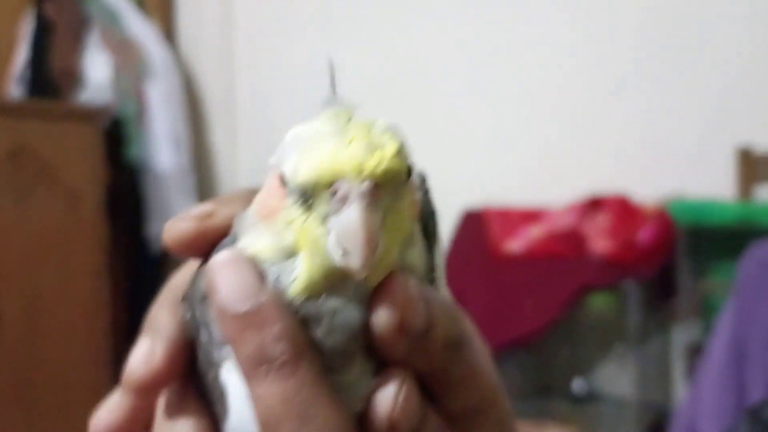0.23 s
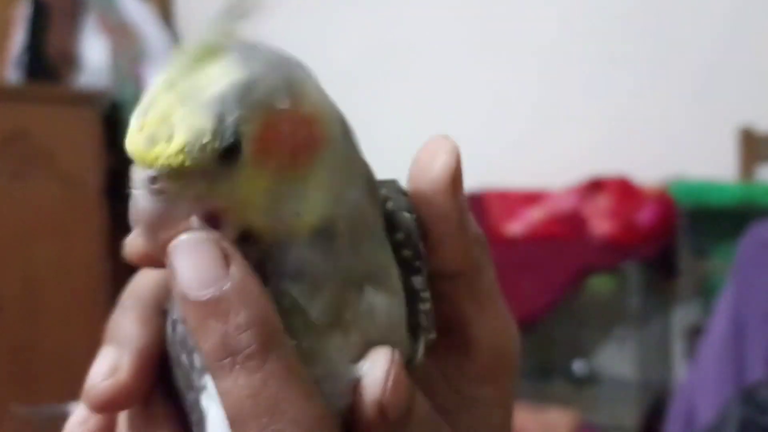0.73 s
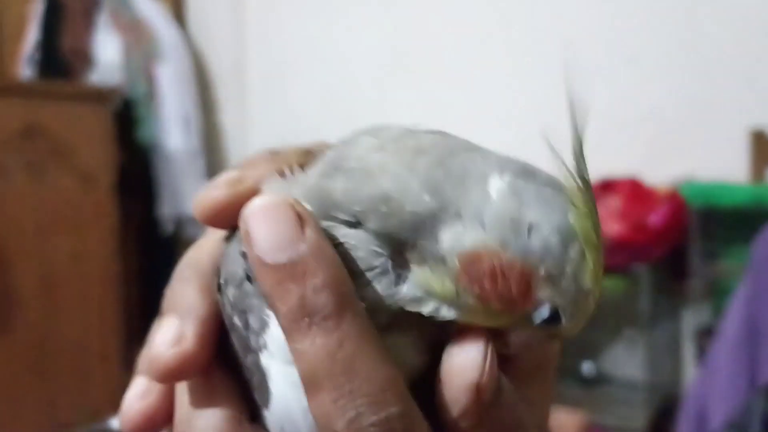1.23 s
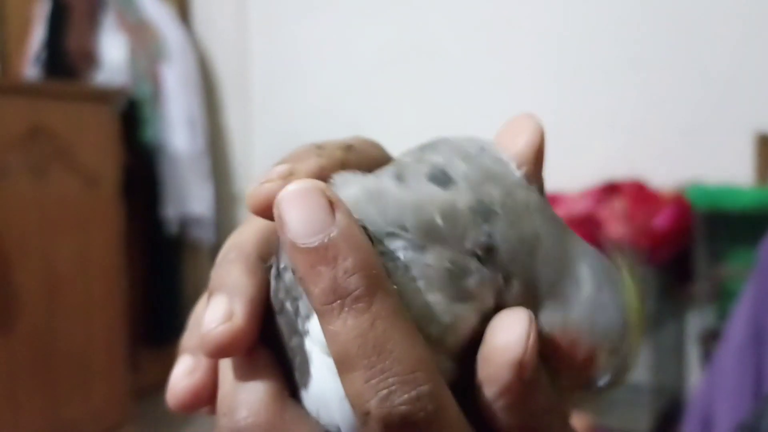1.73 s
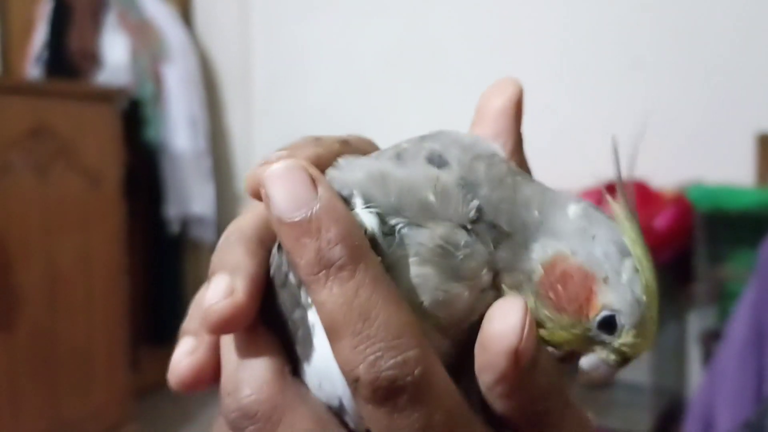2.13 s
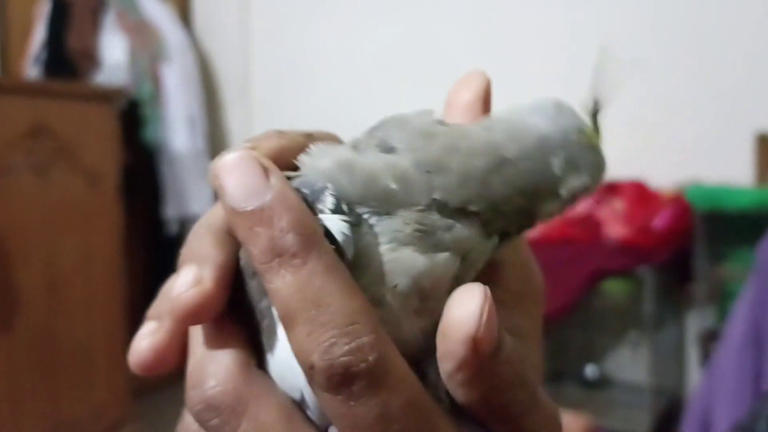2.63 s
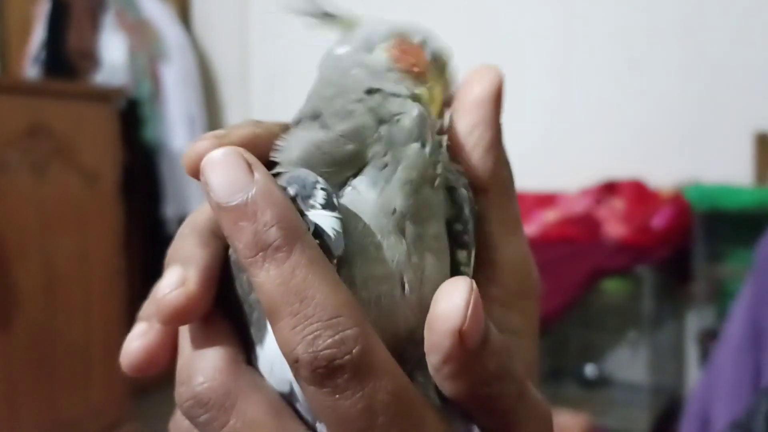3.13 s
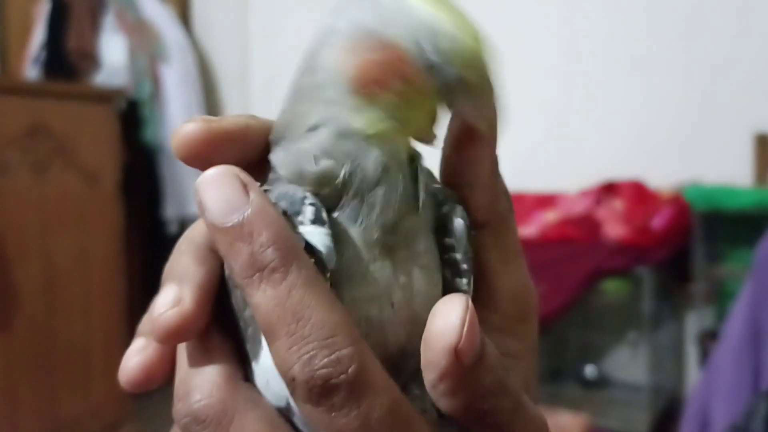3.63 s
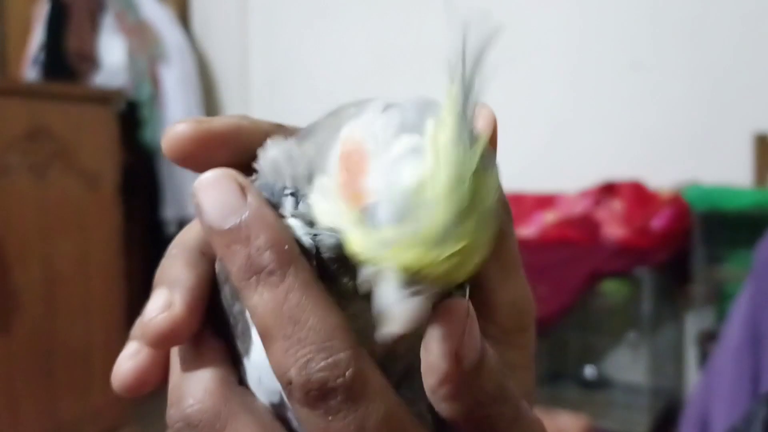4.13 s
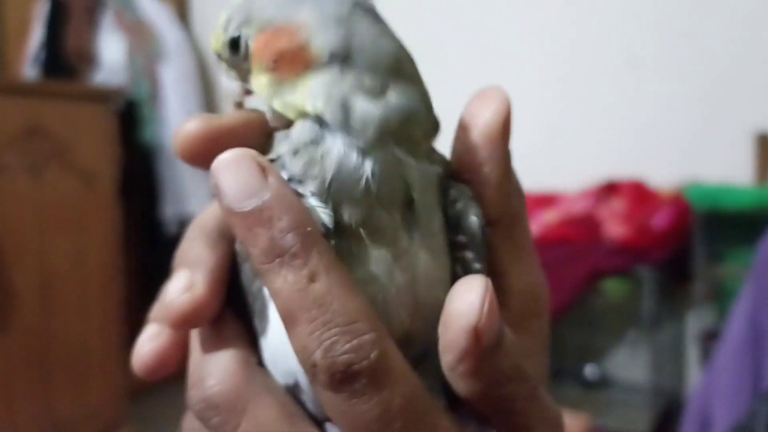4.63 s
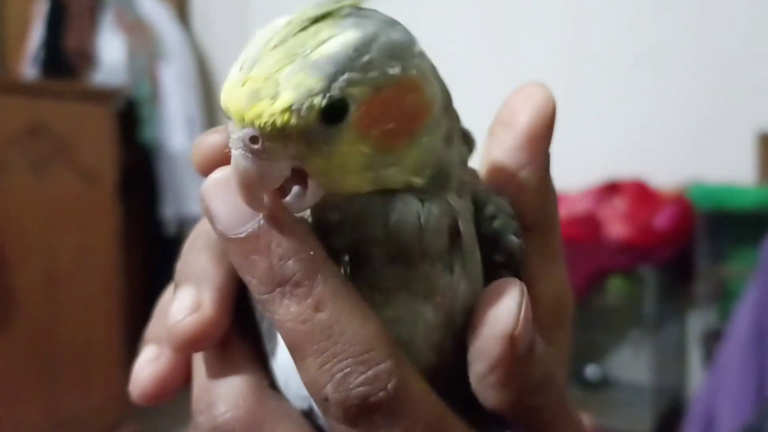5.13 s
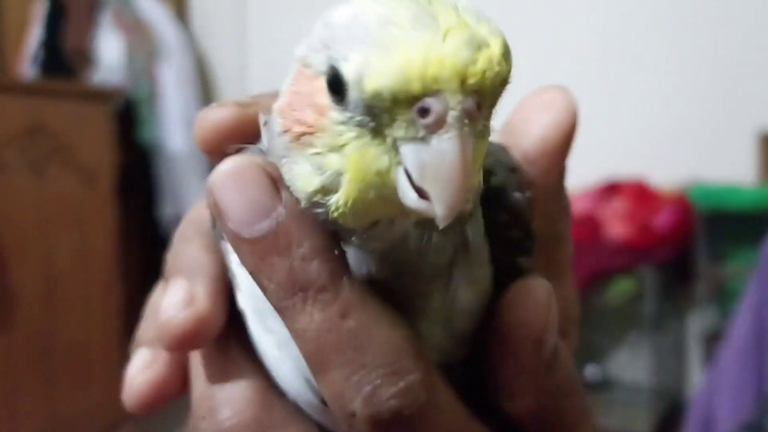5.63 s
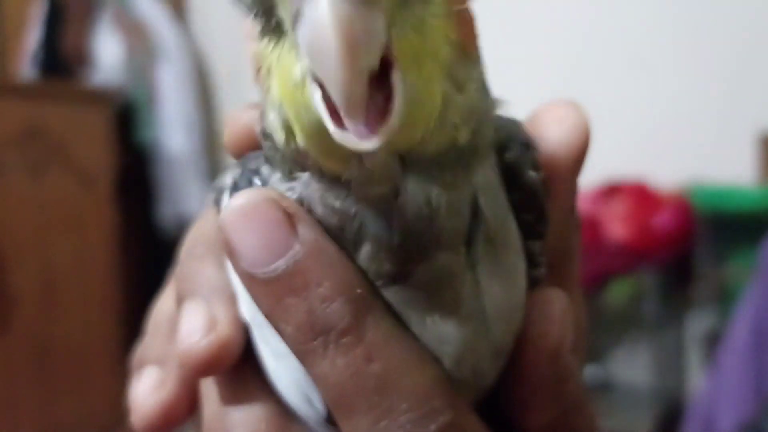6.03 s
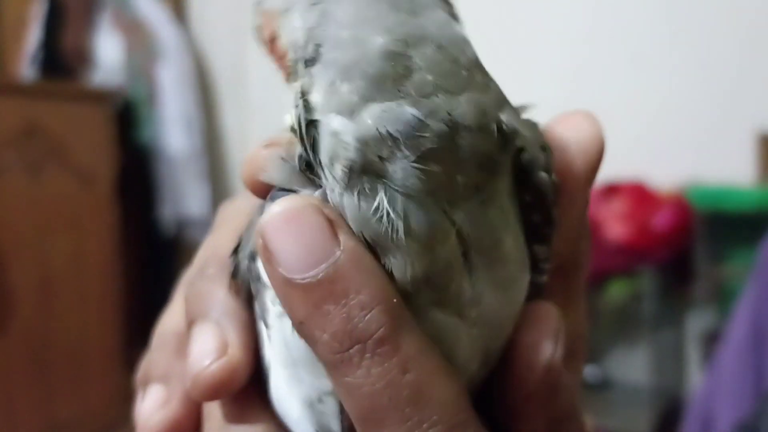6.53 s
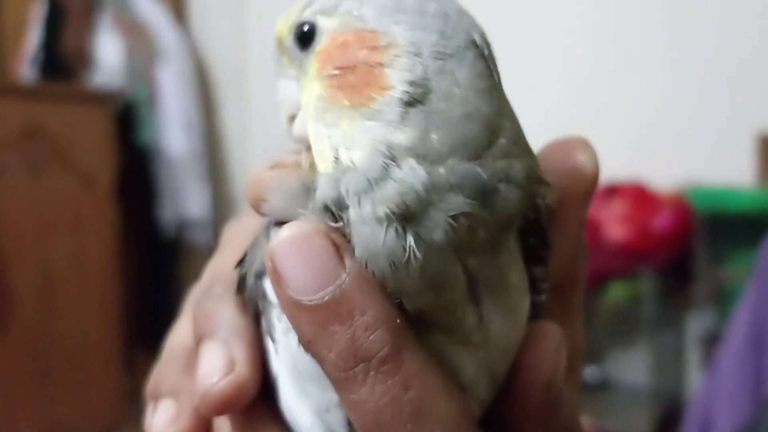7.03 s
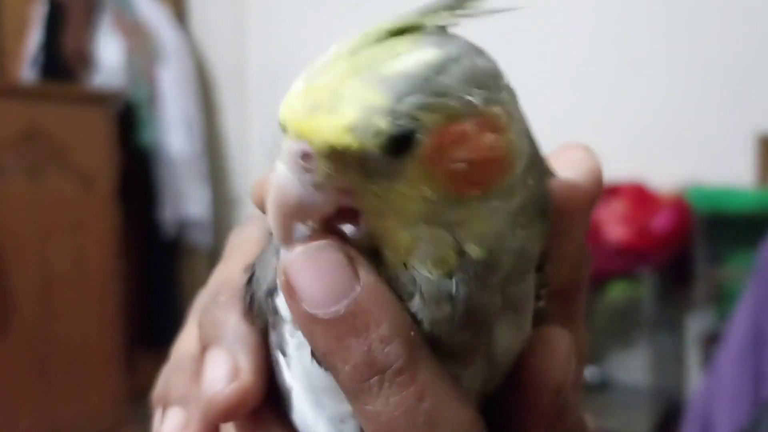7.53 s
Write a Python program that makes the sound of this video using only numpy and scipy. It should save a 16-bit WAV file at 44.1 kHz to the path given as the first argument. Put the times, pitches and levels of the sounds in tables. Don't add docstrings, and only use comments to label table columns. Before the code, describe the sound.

A hand-held cockatiel gives a harsh screech, hisses in breathy bursts with small beak ticks, then squawks again, in a quiet room with faint street rumble.

```python
import sys
import numpy as np
from scipy import signal
from scipy.fft import rfft, irfft, next_fast_len
from scipy.io import wavfile
from scipy.ndimage import uniform_filter1d, map_coordinates

SR = 44100
rng = np.random.default_rng(int(sys.argv[2]) if len(sys.argv) > 2 else 0)


def store_wav(level_fs):
    pcm = np.round(np.clip(np.atleast_2d(level_fs), -1, 1) * 32767)
    wavfile.write(sys.argv[1], SR, pcm.T.astype(np.int16))


def elevation(decibels):
    levels = np.asarray(decibels, float)
    return 10 ** (levels / 20)


N = 343098


def unit(x):
    return x / np.sqrt(np.mean(x ** 2) + 1e-20)


def along(points, hz):
    f, v = np.transpose(points)
    return np.interp(np.log(hz + 1), np.log(f + 1), v)


def curves(rows):
    s, *cols = np.transpose(rows)
    return [np.interp(np.arange(N) / SR, s, c) for c in cols]


def gate(tables, rise_s, fall_s):
    t = np.arange(N) / SR
    spans = []
    for rows in tables:
        since_start = (t - rows[0][0]) / rise_s
        until_end = (rows[-1][0] - t) / fall_s
        spans.append(np.clip(np.minimum(since_start, until_end), 0, 1))
    return np.max(spans, axis=0)


def wobble(rate_hz):
    knots = rng.standard_normal(int(N * rate_hz / SR) + 4)
    return map_coordinates(knots, [np.arange(N) * rate_hz / SR])


def filtered(x, response):
    m = next_fast_len(N + 8192)
    return irfft(rfft(x, m) * response(np.fft.rfftfreq(m, 1 / SR)), m)[..., :N]


def noise(spectrum, channels=1):
    return unit(filtered(rng.standard_normal((channels, N)), lambda hz: elevation(along(spectrum, hz))))


def street():
    # frequency in Hz, level in dB.
    spectrum = [(15, -80), (25, -52), (59, -39), (71, -12.5), (93, 1), (274, -9.5), (410, -12),
                (566, -16.5), (631, -20), (761, -16.5), (919, -21.5), (1380, -24), (3080, -27), (5000, -35),
                (15500, -47.5)]
    # time in seconds, level in dB.
    level = [(0.0, -52), (0.63, -53.5), (0.89, -51.5), (4.94, -55), (5.41, -54), (7.78, -52)]
    # frequency in Hz, left-right correlation from -1 to 1.
    alike = [(30, .1), (50, .3), (75, 1), (130, 0.9), (290, 0.76), (640, 0.19), (1400, -0.28),
             (3100, 0.056), (15000, -0.86)]

    def mid_side_gain(hz):
        turn = np.arccos(np.clip(along(alike, hz), -1, 1)) / 2
        return np.array([np.cos(turn), np.sin(turn)])

    mid, side = filtered(noise(spectrum, channels=2), mid_side_gain)
    balance_db = elevation(1) * np.array([[-.5], [.5]])
    level_db = curves(level)[0] + 1.0 + .8 * wobble(6.4) + balance_db
    return elevation(level_db) * np.array([mid + side, mid - side])


def port_flicker():
    return elevation(-79.5) * noise([(20, -3), (60, -1.5), (90, -44.5)], channels=2)


def rustle():
    # time of peak in seconds, length in seconds, fine part in dB, coarse
    # over fine in dB.
    brushes = [(0.214, 0.36, -61.5, 7.5), (0.655, 0.11, -61, 1.5), (1.668, 0.14, -40, -17.5),
               (1.775, 0.0094, -53, -17.5), (1.794, 0.094, -78, 7.5), (2.115, 0.045, -57, -14.5),
               (4.066, 0.262, -77.5, -5), (4.168, 0.052, -54, -20), (5.011, 0.2, -62.5, 10.5),
               (5.186, 0.037, -67, 1), (5.379, 0.15, -61.5, -7.5), (6.126, .12, -60.5, -3),
               (6.27, 0.1, -59, -21), (6.411, 0.13, -57.5, -20.5), (6.87, 0.11, -66.5, 21),
               (7.665, 0.21, -66.5, 1)]
    # frequency in Hz, level in dB.
    fine_colour = [(7500, -26), (9500, -7), (12000, 1.5), (15500, -4)]
    # frequency in Hz, level in dB.
    coarse_colour = [(2000, -14.5), (3500, -7.5), (4800, -14), (6500, -1), (8000, -25)]
    bed_db, bed_coarse_db = -77.5, -4
    rise_per_length, fall_db_per_length = 0.96, 29
    s, length_s, db, coarse_db = np.transpose(brushes)[..., None]
    age = (np.arange(N) / SR - s) / length_s
    strokes = elevation(db - fall_db_per_length * np.maximum(age, -age / rise_per_length))
    fine = elevation(bed_db) + strokes.sum(0)
    coarse = elevation(bed_db + bed_coarse_db) + (strokes * elevation(coarse_db)).sum(0)
    grain = unit(elevation(1.5 * wobble(400) + 1.5 * wobble(25)))
    brush = fine * noise(fine_colour, channels=2) + coarse * noise(coarse_colour, channels=2)
    return elevation(5.0) * grain * brush * elevation([[1.5], [-1.5]])


def call(crests, half_db, hoarse, thin_db=0, deeper=1, lead_s=.007, tail_s=.008):
    # frequency in Hz, gain in dB.
    throat = [(1200, -8), (2000, -6.5), (2900, -4.5), (3500, -11), (4150, -1.5), (4800, -11.5),
              (5900, -4.5), (6600, -15.5), (7600, -24), (8400, -18.5), (9400, -45), (10500, -28),
              (12000, -22), (13500, -32), (16000, -35.5)]
    # frequency in Hz, level in dB.
    breath = [(5000, -30), (7500, -12), (8600, -10.5), (9300, -33.5), (10200, -9), (12000, 0), (13500, -9),
              (14600, -3), (15600, -6)]
    dip_share = [.35, 1.7, 1, .7, 1, 1, 1]
    quiet_db, least_sag, sag_per_db = -18, .04, .008
    dip_floor_db, dip_db_per_db = 3, .4
    even_db, even_hz = -11, 1640

    end_s, end_warbles, *end_crest = crests[-1]
    run_out = (end_s + .01, end_warbles + .5 * (end_warbles > 0), *end_crest)
    warbles, crest_hz, crest_db = curves(crests + [run_out])
    dip = (1 - np.cos(2 * np.pi * warbles)) / 2
    effort_db = np.clip(crest_db - quiet_db, 0, None)
    dip_db = deeper * dip * (dip_floor_db + dip_db_per_db * effort_db)
    rough = np.minimum(hoarse * elevation(-.9 * (crest_db + 12)), .16) * (1 + 2 * dip)
    sag = (least_sag + sag_per_db * effort_db) * dip
    hz = crest_hz * (1 - sag) * (1 + .25 * rough * wobble(900))
    phase = 2 * np.pi * np.cumsum(hz) / SR

    low_db = even_db * np.clip((even_hz - crest_hz) / 120, 0, 1)
    voice, crest_power = 0, 0
    for k, share in enumerate(dip_share, 1):
        size = elevation(along(throat, k * hz) + thin_db * (k - 4))
        voice = voice + size * elevation(low_db * (k % 2 == 0) - share * dip_db) * np.sin(k * phase)
        crest_power = crest_power + elevation(2 * (along(throat, k * crest_hz) + thin_db * (k - 4.0)))
    voice = voice / np.sqrt(crest_power / 2) + elevation(half_db) * np.sin(phase / 2)

    air = elevation(-19 - 0.66 * dip_db) * noise(breath)[0]
    shake = elevation(16 * rough * wobble(500))
    span = [[crests[0][0] - lead_s], [end_s + tail_s]]
    sung = elevation(crest_db - 8.5) * shake * (voice + air) * gate([span], 0.34 * lead_s, .45 * tail_s)
    return filtered(sung, lambda f: 0.07 + 1.03 / (1 + (1250 / (f + 1)) ** 8))


def screech():
    # time in seconds, warbles so far, crest pitch in Hz, crest level in dB.
    crests = [
        (.024, 0, 1480, -15),
        (.034, 1, 1723, -12),
        (.0565, 3, 1897, -7.5),
        (.07, 4, 2018, -3),
        (.0995, 6, 2116, -4),
        (.1595, 11, 2135, -3.5),
        (.177, 12, 2127, -15),
    ]
    return call(crests, half_db=-31, hoarse=.032)


def ticks():
    # time in seconds, peak in dB, knock over crack in dB, left-right in dB.
    contacts = [(0.3064, -35.5, -9, -9), (0.323, -44, -34.5, 3), (0.388, -53, -10, -7),
                (1.7758, -21, -28, -6.5), (1.7825, -42.5, -20, -5), (1.9806, -47, -6.5, -8.5),
                (2.629, -52, 7, -3.5), (2.683, -67, 23.5, -10.5), (2.8093, -41, 6.5, -13),
                (4.1085, -64, 18, -2.5), (4.3452, -39, -20.5, 5.5), (5.1026, -62, 12, -2),
                (5.137, -46, -9.5, 2.5), (5.143, -33.5, 4.5, 2.5), (5.533, -39, -24, -0.5),
                (5.8442, -45, -5.5, 0), (6.0906, -28.5, -12.5, 10.5), (6.205, -39.5, -1, 2),
                (7.3668, -53, 1.5, -5), (7.6233, -31, -30.5, 6), (7.693, -38, -16, 4.5),
                (7.7321, -43, -12, -1)]
    # time in seconds, frequency in Hz, level in dB.
    rings = [(1.775, 11300, -31.5), (1.775, 6020, -39), (2.629, 4500, -51), (2.685, 4500, -52.5),
             (4.101, 1600, -48), (4.101, 5840, -53), (4.1085, 1700, -39), (4.1085, 4000, -48),
             (4.1085, 5960, -38), (5.1012, 1523, -46), (5.141, 1010, -34), (5.143, 3240, -40),
             (5.142, 6700, -33), (6.0906, 2380, -37), (6.0898, 4130, -48), (6.0924, 6700, -34.5),
             (6.0912, 11900, -31.5), (6.2062, 1460, -35), (6.2059, 3300, -29.5), (6.2057, 4100, -43),
             (6.2065, 6330, -33)]
    crack_t60_s, knock_t60_s, ring_t60_s = .0016, .0019, .006
    length = 600
    t = np.arange(length) / SR
    out = np.zeros((2, N + length))
    for s, db, low_db, pan_db in contacts:
        a, b = rng.standard_normal((2, length))
        burst = (a + 3 * (t == 0)) * elevation(-60 * t / crack_t60_s)
        crack = np.diff(burst, prepend=0) * .45
        knock_phase = 2 * np.pi * 2300 * t + 1.4 * np.cumsum(b)
        knock = np.sin(knock_phase) * elevation(low_db - 60 * t / knock_t60_s)
        gain = elevation(db + np.array([[pan_db], [-pan_db]]) / 2)
        i = round(s * SR)
        out[:, i:i + length] += gain * (crack + knock)
    for s, hz, db in rings:
        i = round(s * SR)
        onset = 1 - np.exp(-t / 0.00032)
        out[:, i:i + length] += elevation(db - 60 * t / ring_t60_s) * np.sin(2 * np.pi * hz * t) * onset
    return out[:, :N]


def hiss():
    # time in seconds, breath in dB, beak gape 0-1, tongue lift 0-1.
    bursts = [
        [(0.703, -42, 0.36, 0.73), (0.754, -26.5, 0.57, 0.8)],
        [(0.755, -44, 0.37, 0.65), (0.854, -36.5, 0.48, 0.5), (0.985, -36, 0.83, 0.72),
         (1.028, -42.5, 0.72, 0.55), (1.115, -33, 0.98, 0.86), (1.19, -38, 0.83, 0.59), (1.5, -37, 0.82, 0.39),
         (1.656, -36, 0.71, 0.36), (1.765, -44, 0.83, 0.62)],
        [(3.164, -47, 0.25, 0), (3.22, -45.5, 0.68, 0.18), (3.294, -45.5, 0.63, 0.57), (3.42, -39.5, .6, 0.64),
         (3.556, -46, 0.38, 0.61), (3.7, -40.5, 0.77, 0.73), (3.77, -42, 0.57, 0.75), (3.798, -38, 0.8, 0.74),
         (3.948, -38, 0.8, 0.6), (4.07, -41.5, 0.66, 0.94)],
        [(4.151, -42, 0.25, 0.43), (4.172, -34.5, .4, 0.64), (4.208, -35, 0.5, 0.9)],
        [(4.343, -36, 0.33, 0.44), (4.379, -38, 0.61, 0.6), (4.5, -37, 0.86, 0.62), (4.62, -39, 0.79, 0.76),
         (4.68, -42, 0.65, 0.53), (4.965, -40.5, 0.67, 0.62), (5.005, -50, 0.5, 1)],
        [(5.168, -57, 0.4, 0.4), (5.215, -68, .3, 0.5)],
        [(6.092, -64.5, 0.5, 0.76), (6.17, -56, .3, 0.78)],
        [(6.218, -37.5, 0, 0.24), (6.27, -37.5, 0.4, 0.4), (6.35, -37, 0.4, 0.4), (6.43, -38, 0.5, 0.47),
         (6.505, -42, 0.35, 0.65)],
    ]
    # time in seconds, breath in dB, beak gape 0-1, tongue lift 0-1.
    rasp = [(6.519, -60, 0.6, 0.67), (6.572, -39.5, 0.14, 0.1), (6.6, -38.5, 1, 0.22),
            (6.69, -42.5, 0.85, 0.89), (6.73, -40.5, 0.57, 0.73), (6.78, -41.5, 1, 1),
            (6.825, -40, 0.95, 1), (6.879, -42.5, 0.34, .99)]
    # Hz at rest, Hz by gape, Hz by tongue.
    pipe_hz = [(1355, 430, 6), (3300, 48, 803)]
    # dB at rest, dB by gape, dB by tongue.
    pipe_db = [(-22.5, 34, .1), (-19, 0.27, 31.15), (-39, 20.1, 10)]
    widths_hz = [210, 700, 1050, 1309, 1700]
    air_hz = [10210, 12900]
    # time in seconds, frequency in Hz.
    neck = [(.72, 6130), (.85, 6360), (1.15, 6700), (1.27, 6340), (1.38, 5840), (1.52, 5100), (1.658, 6140),
            (3.302, 6080), (3.45, 5960), (3.64, 6720), (3.949, 6210), (4.4, 6550), (4.5, 5470),
            (4.66, 6360), (4.84, 5820), (4.95, 6400), (6.3, 6400), (6.8, 6010)]
    # time in seconds, low gain in dB, low shift in Hz, jet in dB.
    pouch = [(.72, 7, -1, .3), (.8, -2.5, 1, 1), (1.0, -2, 1, -0.8), (1.1, -1, 1, -2), (1.3, 0, 79, 0.5),
             (1.45, 2, 52, 1), (1.58, -8, 1, -3), (1.75, -5.5, 1, 2), (3.17, 3, 1, -0.2),
             (3.3, -0.5, 1, -0.5), (3.5, 0.5, 3, 0.1), (3.8, 2.5, 1, 0.1), (4.05, -2, 1, 1.5),
             (4.17, 2.5, 0, -0.4), (4.35, 2.5, 1, -1.5), (4.4, -1.5, 1, 0.7), (4.6, -2.5, 1, 0.8),
             (4.95, -0.5, 1, 0.9), (6.1, -9, 1, -3.5), (6.25, -3.5, -80, -2), (6.36, -4.5, -49.5, -0.5),
             (6.47, -9, 1, -1), (6.6, 3.5, 1, 0.5), (6.72, 4.5, 1, 0.5), (6.85, 5.5, 1, -2)]
    # frequency in Hz, level in dB.
    jet_colour = [(150, -84), (330, -21.5), (600, -14.5), (1000, -5), (2300, -2), (2900, -9.5),
                  (4800, -11.5), (7400, -39.5), (8300, -54.5), (16000, -69)]

    low_db, gape, tongue = curves(sum(bursts, []) + rasp)

    def posture(rows):
        return [rest + by_gape * gape + by_tongue * tongue for rest, by_gape, by_tongue in rows]

    pouch_db, pouch_hz, veil_db = curves(pouch)
    mid_db, high_db, air_db = posture(pipe_db)
    low_hz, mid_hz = posture(pipe_hz)
    levels = [pouch_db, mid_db, high_db, air_db - 1.0 + 3 * wobble(3.61), air_db + 0.5 + 3 * wobble(2.4)]
    centres = [low_hz + pouch_hz, mid_hz] + curves(neck) + air_hz

    hz, t, z = signal.stft(rng.standard_normal(N), SR, nperseg=512)
    at = np.minimum((t * SR).astype(int), N - 1)
    hz = hz[:, None]
    power = elevation(2 * (along(jet_colour, hz) + veil_db[at])) / 400
    for db, centre, width in zip(levels, centres, widths_hz):
        drift_hz = (centre * (1 + .012 * wobble(25)))[at]
        power = power + elevation(2 * db[at]) / width / (1 + (2 * (hz - drift_hz) / width) ** 4)
    notch_db = -14 / (1 + ((hz - 4780) / 300) ** 4) - 19 / (1 + ((hz - 8250) / 520) ** 4)
    power = power * elevation(notch_db)
    patches = uniform_filter1d(rng.standard_normal(z.shape), size=7, axis=0)
    patches = uniform_filter1d(patches, size=12, axis=1)
    shaped = z * np.sqrt(power * SR / 2) * elevation(1.1 * unit(patches))
    jet = signal.istft(shaped, SR, nperseg=512)[1][:N]
    flutter = elevation(0.17 * wobble(220) + 1.4 * wobble(30))
    valve = gate(bursts + [rasp], rise_s=0.0011, fall_s=0.041) ** 2
    return elevation(low_db + 1.5) * flutter * jet * valve


def engine_tone(rows, spread_hz):
    hz, db = curves(rows)
    wander_hz = spread_hz * np.array([wobble(60), wobble(60)])
    phase = 2 * np.pi * np.cumsum(hz + wander_hz, axis=1) / SR
    return elevation(db + 1.8 * wobble(14)) * np.sin(phase) * gate([rows], .05, .05)


def drone():
    # time in seconds, frequency in Hz, level in dB.
    rows = [
        (.8, 181.6, -83.5),
        (.84, 174, -39),
        (.92, 165, -46),
        (1.0, 175.3, -48),
        (1.04, 165, -76),
    ]
    return engine_tone(rows, spread_hz=1.2)


def snort():
    # time in seconds, level in dB.
    puff = [
        (1.988, -52),
        (2.003, -34.5),
        (2.018, -32.5),
        (2.042, -42),
        (2.052, -51),
        (2.09, -68),
    ]
    # frequency in Hz, level in dB.
    puff_colour = [(240, -49), (400, -23), (747, -22), (817, -6), (1020, -12.5), (2730, -9), (4450, -15),
                   (10200, -59), (12700, -33), (15000, -53.5)]
    flow = elevation(curves(puff)[0] - 1.0) * gate([puff], 0.006, 0.02) * elevation(3.0 * wobble(260))
    return flow * noise(puff_colour)[0]


def motor():
    # time in seconds, frequency in Hz, level in dB.
    whine = [
        (2.2, 1585, -71),
        (3.1, 1500, -66.5),
        (5.2, 1052, -65),
        (7.1, 690, -58.5),
        (7.3, 666, -54),
        (7.36, 640, -59),
    ]
    # time in seconds, frequency in Hz, level in dB.
    idle = [
        (7.36, 515, -41.5),
        (7.42, 518.7, -50),
        (7.8, 468, -66.5),
    ]
    return engine_tone(whine, spread_hz=40) + engine_tone(idle, spread_hz=30)


def horn():
    # start in seconds, length in seconds, frequency in Hz, level in dB.
    reeds = [
        (2.922, 0.71, 367.4, -59),
        (2.964, 0.74, 430, -57),
        (6.953, 0.62, 376, -67),
    ]
    # frequency in Hz, gain in dB.
    bell = [(370, -8), (800, -26), (2200, -26), (2600, -13.5), (2970, 1), (3500, -0.5), (3750, -30),
            (4200, -28.5)]
    out = 0
    for s, length_s, hz, db in reeds:
        phase = 2 * np.pi * np.cumsum(hz * (1 + .007 * wobble(100))) / SR
        stack = 0
        for k in range(1, 11):
            stack = stack + elevation(along(bell, k * hz) + 4.8 * wobble(30)) * np.sin(k * phase)
        smear = 0.98 * noise(bell, channels=2)
        out = out + elevation(db) * (stack + smear) * gate([[[s], [s + length_s]]], 0.066, 0.44)
    return out * elevation([[1.5], [-1.5]])


def chirp():
    # time in seconds, warbles so far, crest pitch in Hz, crest level in dB.
    crests = [
        (5.002, 0, 2180, -23),
        (5.008, 0, 1820, -28),
    ]
    return call(crests, half_db=-70, hoarse=.01, thin_db=-9, lead_s=.002, tail_s=.003)


def squawk():
    # time in seconds, warbles so far, crest pitch in Hz, crest level in dB.
    warble = [(6.582, 0, 1615, -17), (6.596, 1, 1760, -9), (6.6235, 3, 2023, -2.5), (6.64, 4, 2180, -9),
              (6.650, 4.5, 1950, -14), (6.656, 4.8, 2750, -13), (6.661, 5, 2950, -13),
              (6.666, 5.2, 2700, -16), (6.671, 5.5, 2050, -21), (6.682, 6, 2056, -6), (6.703, 7, 1870, -9)]
    croak = [
        (6.716, 0, 1770, -21),
        (6.728, .5, 1780, -24),
        (6.748, 2, 2050, -20),
        (6.764, 3, 1700, -17),
        (6.785, 4, 1900, -24),
        (6.81, 6, 2000, -28),
    ]
    peep = [
        (6.837, 0, 1790, -12.5),
        (6.843, 0, 1730, -15),
    ]
    out = call(warble, half_db=-31, hoarse=.05, thin_db=-.5, deeper=1.5)
    out = out + call(croak, half_db=-31, hoarse=.07, thin_db=-.5)
    return out + call(peep, half_db=-60, hoarse=.025, thin_db=-4)


def ports(x):
    # time in seconds, left lag below the bend in samples, lag above it, treble left-right in dB.
    head = [(0, 4.5, 5.5, -19), (.3, 10.5, 1.5, -5), (.6, -11.5, -13, 2), (.97, -12.5, -11.5, 1),
            (1.1, -7, -13.5, -3.5), (1.35, -5, -7, -13.5), (1.6, -2.5, -9.5, -9), (2, -2, -10.5, -10),
            (3.1, -2.5, -10, -8.5), (3.4, -6, -8.5, -13.5), (3.9, -7, -8.5, -11), (4.2, -9, -10, -4),
            (4.5, -9, -13.5, -4.5), (4.85, -12, -12.5, -3.5), (6.2, -13, -15.5, 7), (6.47, -12.5, -17, -3),
            (6.55, 8.5, 6.5, -12), (7.8, -8, 1, -7)]
    # frequency in Hz, left-right in dB.
    port_tilt = [(300, -6.5), (700, 6.5), (1300, -2), (2400, 0.5), (4000, -2.5), (4900, -4.5), (5600, 2),
                 (7000, -8), (9500, 14.5), (12000, 10.5), (15000, 7.5)]
    bend_hz, shade_hz = 3042, 2670
    null_hz, null_width_hz, null_db = 3830, 830, -3
    hz, t, z = signal.stft(x, SR, nperseg=512)
    at = np.minimum((t * SR).astype(int), N - 1)
    lag, high_lag, pan_db = (c[at] for c in curves(head))
    hz = hz[:, None]
    lag_cycles = lag * np.minimum(hz, bend_hz) + high_lag * np.maximum(hz - bend_hz, 0)
    turn = 2 * np.pi / SR * lag_cycles
    tilt_db = along(port_tilt, hz) + pan_db / (1 + (shade_hz / (hz + 1)) ** 4)
    null = elevation(null_db / (1 + ((hz - null_hz) / null_width_hz) ** 2))
    half = elevation(tilt_db / 2) * np.exp(-.5j * turn)
    return signal.istft(np.array([z * half * null, z / half]), SR, nperseg=512)[1][:, :N]


def room(x):
    # frequency in Hz, T60 in seconds.
    t60 = [(300, 0.18), (2000, 0.27), (5000, 0.3), (12000, 0.14)]
    hz, t, z = signal.stft(rng.standard_normal((2, SR // 2)), SR, nperseg=256)
    decay = elevation(-60 * t / along(t60, hz)[:, None])
    tail = signal.istft(z * decay, SR, nperseg=256)[1]
    delayed = np.pad(x, (500, 0))[None]
    return signal.fftconvolve(delayed, tail / np.linalg.norm(tail[0]), axes=1)[:, :N]


def scene():
    bird = screech() + hiss() + snort() + chirp() + squawk()
    contacts = ticks()
    near = ports(bird) + contacts + rustle()
    outside = street() + drone() + motor() + horn()
    return near + elevation(-13.5) * room(bird + contacts.mean(0)) + outside + port_flicker()


def starved(x, under_db):
    hz, t, z = signal.stft(x, SR, nperseg=1024)
    bins = len(hz)
    band = np.add.reduceat(np.abs(z) ** 2, np.arange(0, bins, 12), axis=1)
    band = np.repeat(band, 12, axis=1)[:, :bins]
    whim = rng.standard_normal((bins // 12 + 1, len(t)))
    whim_db = np.repeat(unit(uniform_filter1d(whim, size=5, axis=1)), 12, axis=0)[:bins]
    hz = hz[:, None]
    loudest = np.where(hz > 900, band, 0).max(1, keepdims=True)
    loudest = uniform_filter1d(loudest, size=3, axis=2)
    top_hz = 13300 + 220 * np.clip(-37 - 10 * np.log10(loudest + 1e-12), 0, 10)
    floor_db = under_db + 4 * whim_db + np.clip(hz - top_hz, 0, None) / 90
    whole = (loudest < elevation(-114)) | (loudest > elevation(-46))
    keep = (band > loudest * elevation(2 * floor_db)) | (hz < 7400) | whole
    return signal.istft(z * keep * (hz < 15640), SR, nperseg=1024)[1][:, :N]


def low_pass(x):
    return signal.sosfilt(signal.butter(12, 15640, fs=SR, output="sos"), x)


def record(dry):
    clipped = np.clip(dry, -1, 1)
    return low_pass(starved(clipped, under_db=-37.0))


dry = scene()
out = record(dry)
store_wav(out)
```